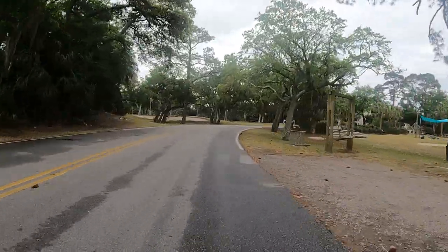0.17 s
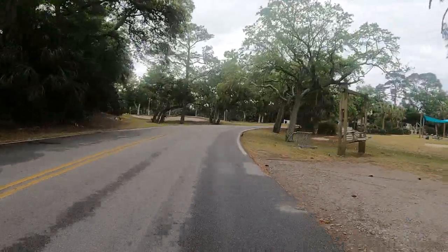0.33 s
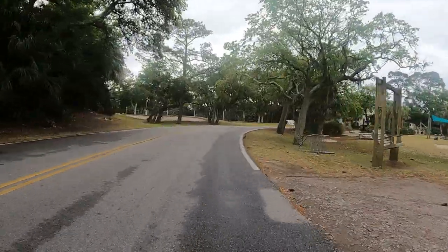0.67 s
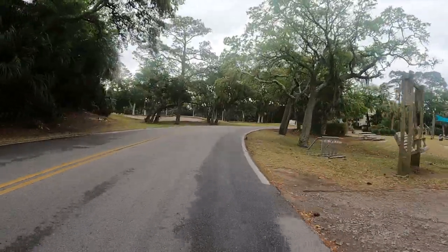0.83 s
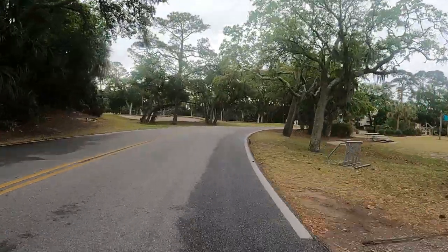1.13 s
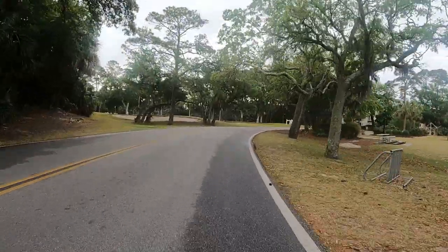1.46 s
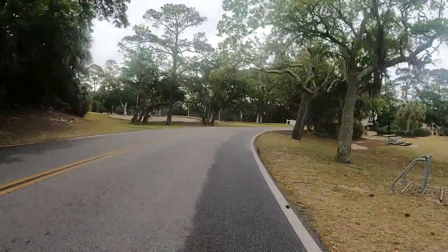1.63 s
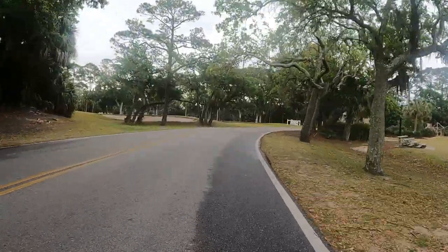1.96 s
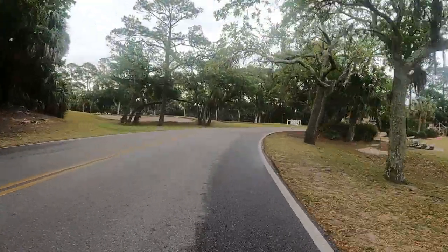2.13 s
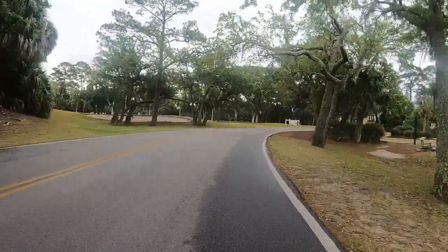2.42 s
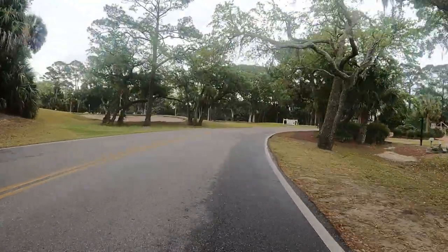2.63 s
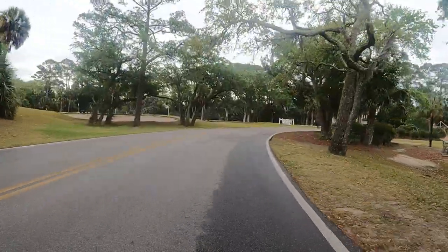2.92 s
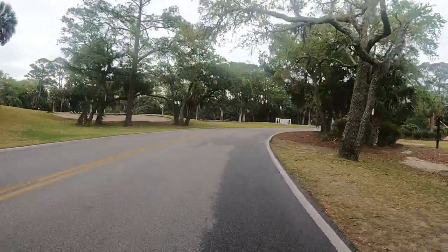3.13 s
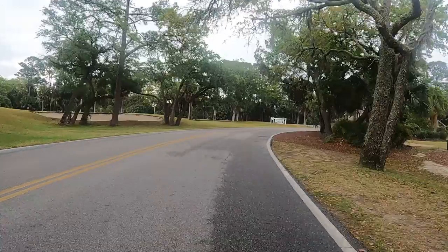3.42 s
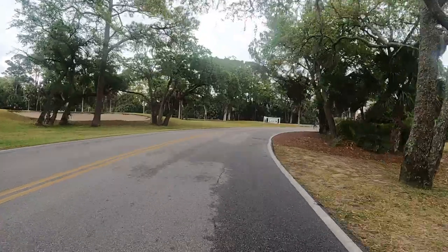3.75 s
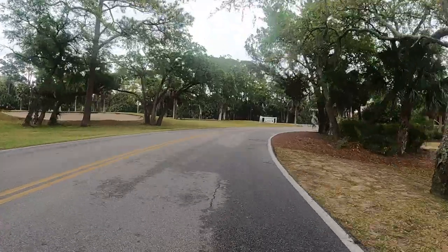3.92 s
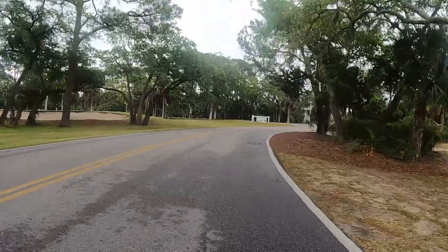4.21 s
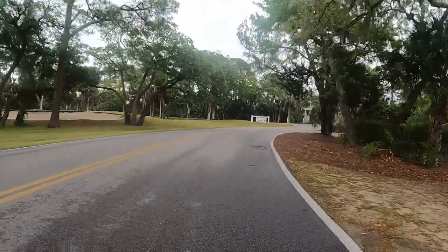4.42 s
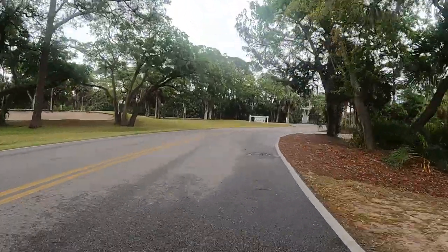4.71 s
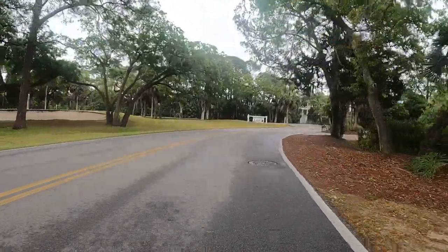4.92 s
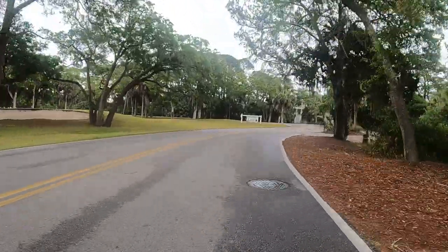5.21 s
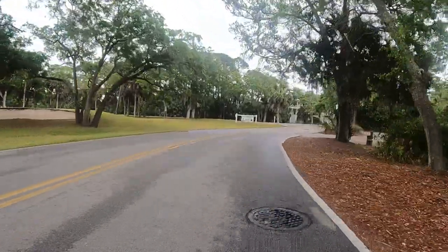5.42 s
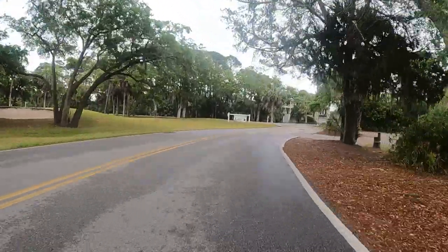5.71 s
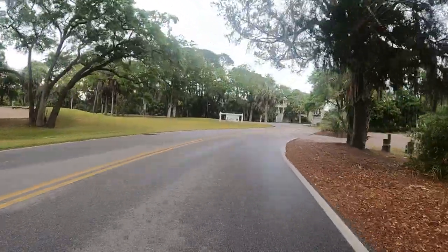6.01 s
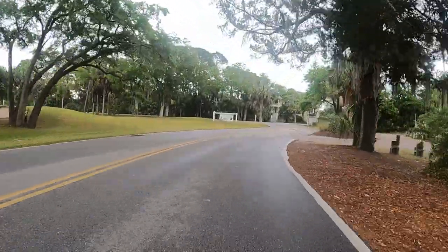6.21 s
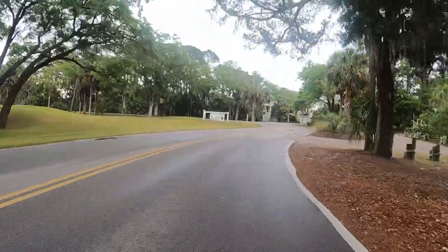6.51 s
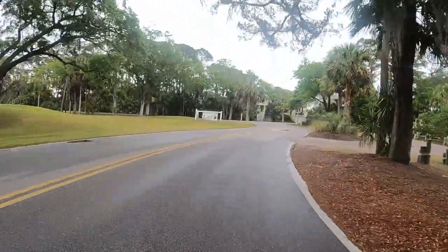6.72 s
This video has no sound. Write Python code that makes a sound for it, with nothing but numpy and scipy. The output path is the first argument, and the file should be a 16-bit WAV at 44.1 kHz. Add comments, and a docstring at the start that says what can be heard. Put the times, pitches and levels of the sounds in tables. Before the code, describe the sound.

A seven-second ride in a small petrol golf cart, heard in mono from the seat, outdoors on asphalt. The single-cylinder engine is already running at governed speed, firing about 24 times a second, a boomy, fluttering drone strongest around 100 to 200 Hz, with soft intake gulps and light valve ticks. Broad tyre roar, deep floor rumble, faint gear whine, fine high grit and a barely audible metallic jingle continue throughout. At 0.2 s a dull low bump; around 0.4 to 1.4 s wind gusts buffet the microphone, with slightly rougher road near 0.6 s, and a quick gust at 1.9 s. From 2 to 5.8 s it stays even, pitch wandering only slightly, the road roar lifting a touch at 2.9 s. Near 6 s a coarser patch brings another soft bump, more grit, then a short strong wind puff at 6.1 s. The engine sags about one percent lower by the end, still running.

```python
"""A petrol golf cart's single-cylinder four-stroke engine, heard from the seat on an asphalt road.
It fires about 24 times a second: tones locked to the engine cycle boom with muffler-like delays, and windowed
noise adds intake gulps and valve ticks. The transaxle whines faintly in sines and a loose part jingles.
Coloured noise makes tyre roar, body rumble, bumps and gusty wind; random impulses make the grit."""
import sys
import numpy as np
from scipy import signal
from scipy.fft import rfft, irfft, next_fast_len
from scipy.io import wavfile

SR = 44100
rng = np.random.default_rng(int(sys.argv[2]) if len(sys.argv) > 2 else 0)


def master_out(mix):
    """Clip the mix to full scale and print it as 16-bit PCM to the path in sys.argv[1]."""
    frames = np.transpose(np.atleast_2d(mix))
    ceiling = np.clip(frames, -1, 1)
    pcm = np.round(ceiling * 32767).astype(np.int16)
    wavfile.write(sys.argv[1], SR, pcm)


N = 302956

GOVERNED_RPM = 2916   # crankshaft speed; one firing cycle takes two turns


def from_db(db):
    """Turn decibels into amplitude gain."""
    return 10 ** (np.asarray(db) / 20)


def rms_one(x):
    """Scale to an rms of 1."""
    return x / np.sqrt(np.mean(x ** 2) + 1e-20)


def in_time(rows):
    """Interpolate each column of a curve to one value per sample; the first column is time."""
    s, *columns = np.transpose(rows)
    return [np.interp(np.arange(N) / SR, s, c) for c in columns]


def coloured(x, spectrum):
    """Filter x by a gain curve over log frequency, falling steeply beyond its ends; rms 1."""
    hz, db = np.transpose(spectrum)
    size = next_fast_len(N + SR // 4)
    f = np.maximum(np.fft.rfftfreq(size, 1 / SR), 1)
    gain = from_db(np.interp(np.log(f), np.log(hz), db))
    ends = np.minimum(1, np.minimum(f / hz[0], hz[-1] / f)) ** 2
    return rms_one(irfft(rfft(x, size) * gain * ends, size)[:N])


def drift(rate):
    """Smooth random wander with an rms of 1: noise low-passed near rate Hz by a double pole."""
    step = 40   # samples between computed points
    warm_up = 2000   # points dropped while the filter settles
    r = np.exp(-2 * np.pi * rate * step / SR)
    noise = rng.standard_normal(N // step + warm_up + 2)
    slow = signal.lfilter([1], [1, -2 * r, r * r], noise)[warm_up:]
    return np.interp(np.arange(N) / step, np.arange(len(slow)), rms_one(slow))


def stroke(cycle, centre, width):
    """A bell-shaped window that opens once per engine cycle; centre and width in cycles."""
    offset = (cycle - centre + .5) % 1 - .5
    return np.exp(-.5 * (offset / width) ** 2)


def swells(rows):
    """Add a bell-shaped rise and fall in dB for each row of time, lift and half-length."""
    t = np.arange(N) / SR
    return sum(db * np.exp(-.5 * ((t - s) / length) ** 2) for s, db, length in rows)


def exhaust(cycle, uneven_db, waver_db):
    """Each firing puffs through the muffler, whose resonances delay its harmonics into a short low ring."""
    # harmonics of the firing rate; 4, 7 and 8 boom, and the boom slowly passes from 7 to 8:
    # multiple of the firing rate, starting level/dB, level slope/(dB/s)
    orders = [(1, -36.5, 0.5), (2, -32, 0), (3, -33.5, 0), (4, -21, -0.24), (5, -26.5, -0.66),
              (6, -36, 0.5), (7, -23, -0.69), (8, -27, 0.7051), (9, -34, 0), (10, -36, 0), (11, -46.5, 0.5),
              (12, -48.5, 0.5), (13, -42.5, 0), (14, -43.5, -0.5), (15, -50, 0.5), (17, -47, 0)]
    # muffler resonances that delay each puff: f/Hz, width/Hz
    muffler = [(100, 10), (159, 104), (214, 49)]
    t = np.arange(N) / SR
    firing_hz = GOVERNED_RPM / 120
    out = np.zeros(N)
    for k, db, db_per_s in orders:
        lag = sum(2 * np.arctan(2 * (k * firing_hz - hz) / width) for hz, width in muffler)
        level_db = db + db_per_s * t + waver_db * drift(3.6)
        out += from_db(level_db) * np.cos(2 * np.pi * k * cycle - lag)
    firing_strength = from_db(uneven_db * drift(11))
    return np.sqrt(2) * out * firing_strength   # sqrt(2) makes the order levels rms


def intake(cycle, level_db):
    """The intake gulps air once a cycle: a short swell of mid-band noise."""
    # tone of the gulp: f/Hz, relative gain/dB
    intake_colour = [(220, -10.5), (285, 0), (320, -4), (385, -3), (470, -15), (800, -30)]
    gulps = rng.standard_normal(N) * stroke(cycle, 0.629, 0.076)
    return from_db(level_db) * coloured(gulps, intake_colour)


def valves(cycle, tick_db):
    """Two valves tick as they seat in each cycle, one more crisply than the other."""
    # tone of the ticks: f/Hz, relative gain/dB
    valve_colour = [(600, -10.5), (1200, 6.5), (1600, -3.5), (2400, -14), (3500, -22), (7000, -35)]
    seats = stroke(cycle, .81, 0.016) + 1.2 * stroke(cycle, .48, 0.033)
    return from_db(tick_db) * coloured(rng.standard_normal(N) * seats, valve_colour)


def transaxle(cycle, wobble):
    """Gear tones follow the engine speed, their phase blurred by backlash; wobble in radians."""
    # gear whine: f at governed speed/Hz, level/dB
    whine = [(680, -53.5), (729, -53.5), (1168, -53), (1290, -56.5), (1314, -63), (1360, -60.5),
             (2291, -62)]
    turned_s = cycle * 120 / GOVERNED_RPM   # time the same turning would take at governed speed
    out = np.zeros(N)
    for hz, db in whine:
        phase = 2 * np.pi * hz * turned_s + wobble * drift(4.5)
        out += from_db(db + 1.9 * drift(6.4)) * np.cos(phase)
    return np.sqrt(2) * out


def jingle(cycle, level_db, uneven_db):
    """The engine keeps a small loose metal part jingling thinly, with an uneven swell once a cycle."""
    # tone of the loose part: f/Hz, relative gain/dB
    jingle_colour = [(11600, -26.5), (12300, -2.5), (12800, -5), (13600, -22.5)]
    unevenness = from_db(uneven_db * np.clip(drift(15), -2, 2))
    shakes = (.8 + stroke(cycle, .6, .12)) * unevenness
    return from_db(level_db) * coloured(rng.standard_normal(N) * shakes, jingle_colour)


def tyres(rough_db, texture_db):
    """Tread on asphalt: a broad roar that flutters with the surface and sets the panels ringing."""
    # tone of the rolling noise: f/Hz, relative gain/dB
    road_colour = [(80, 2), (300, 5.5), (480, 0.5), (700, -3), (950, -4), (1080, -8.5), (1300, -6.5),
                   (1850, -13), (2650, -17), (3100, -23), (4500, -28.5), (6400, -33.5), (8700, -43),
                   (11500, -51)]
    # body panels that ring under the rolling noise: f/Hz, width/Hz, lift/dB
    panels = [(572, 34, 3.5), (668.5, 20, 5), (797, 61, 2.5), (1008, 17, 3), (1169, 120, 3), (1348, 38, 3),
              (1580, 87, 1.5), (2660, 70, 0.5), (2730, 57, 0)]
    smooth_db, slope_db_per_s = -31, -0.0571   # smooth asphalt, easing slowly as the ride goes on
    road_db = smooth_db + slope_db_per_s * np.arange(N) / SR + rough_db
    roar = coloured(rng.standard_normal(N), road_colour)
    for hz, width, lift_db in panels:
        b, a = signal.iirpeak(hz, hz / width, fs=SR)
        roar = roar + (from_db(lift_db) - 1) * signal.lfilter(b, a, roar)
    return from_db(road_db + texture_db * drift(14)) * rms_one(roar)


def grit(cycle, rough_db, grains_per_s, spread_db, shake):
    """Fine grains tick on the underbody as random impulses, louder each time the engine shakes it."""
    # tone of the grains: f/Hz, relative gain/dB
    grit_colour = [(2500, -1), (5000, 5), (8500, 4), (9700, -7), (10800, -4.5), (11500, -14.5),
                   (13000, -16.5), (15500, -15)]
    smooth_db = -66.5   # grit on smooth asphalt
    grit_per_roar = 1.8   # dB of grit per dB of roar
    born = rng.random(N) < grains_per_s / SR
    sizes = from_db(spread_db * np.minimum(rng.exponential(1, N), 5))
    impulses = born * sizes * rng.choice([-1, 1], N)
    shaken = impulses * (1 + shake * stroke(cycle, 0.66, .13))
    return from_db(smooth_db + grit_per_roar * rough_db) * coloured(shaken, grit_colour)


def rumble(level_db):
    """The rolling wheels shake floor and roof into a steady low noise."""
    # tone of the body: f/Hz, relative gain/dB
    rumble_colour = [(40, -2), (80, -3.5), (120, -1), (190, 0), (260, 1.5), (310, -7), (380, -12.5),
                     (480, -23.5)]
    return from_db(level_db) * coloured(rng.standard_normal(N), rumble_colour)


def bumps():
    """Uneven road heaves the body; soft tyres turn each bump into a dull swell of low noise."""
    # bumps in the road: t/s, level/dB, half-length/s
    road_bumps = [(0.193, -19, 0.042), (5.97, -19.5, 0.067)]
    # the body's answer to a bump: f/Hz, relative gain/dB
    bump_colour = [(25, -13), (40, 7.5), (62, -5), (90, -20), (150, -18), (300, -37)]
    t = np.arange(N) / SR
    heave = sum(from_db(db) * np.exp(-.5 * ((t - s) / length) ** 2) for s, db, length in road_bumps)
    return heave * coloured(rng.standard_normal(N), bump_colour)


def airstream(buffet_db):
    """Eddies press on the microphone as a deep, uneven rumble that rises with each gust."""
    # tone of the wind: f/Hz, relative gain/dB
    wind_colour = [(10, -8), (17, 0), (28, -6), (38, -12), (58, -10.5), (100, -21), (200, -33), (500, -58)]
    # gusts on top of the airstream: t/s, lift/dB, half-length/s
    gusts = [(.4, 4.5, .2), (.83, 5.5, .07), (1.35, 4, .17), (1.9, 8, 0.045), (6.12, 10, .05)]
    between_gusts_db = -30
    wind_db = between_gusts_db + swells(gusts) + buffet_db * drift(3.4)
    return from_db(wind_db) * coloured(rng.standard_normal(N), wind_colour)


def scene():
    """Mix engine, drive, road and air; engine sounds share one cycle count, road sounds one roughness."""
    # the governor hunts a little, then lets the speed sag: t/s, speed above governed/rpm
    speed = [(0, 12), (1.8, 1), (2.7, 10.1), (4.4, -3), (5.4, 2.6), (5.85, -18.3), (6.87, -27.3)]
    # coarser stretches of road swell the roar and throw up more grit: t/s, lift/dB, half-length/s
    rough_patches = [(.33, 1.1, .07), (.56, 2, 0.083), (.93, .9, 0.046), (2.9, 0.6, .09), (5.95, 1, 0.083)]
    extra_rpm, = in_time(speed)
    start_cycle = .632
    cycle = start_cycle + np.cumsum(GOVERNED_RPM + extra_rpm) / (120 * SR)
    rough_db = swells(rough_patches)
    engine = exhaust(cycle, uneven_db=0.32, waver_db=0.84)
    engine += intake(cycle, level_db=-37.0) + valves(cycle, tick_db=-51)
    drive = transaxle(cycle, wobble=1.0) + jingle(cycle, level_db=-81.5, uneven_db=1.4)
    road = tyres(rough_db, texture_db=0.16)
    road += grit(cycle, rough_db, grains_per_s=5100, spread_db=1.0, shake=0.45)
    road += rumble(level_db=-26) + bumps()
    return (engine + drive + road + airstream(buffet_db=1.1))[None]


def record(dry):
    """The microphone rounds the tallest peaks; a steep low-pass then cuts the top."""
    ceiling, cutoff_hz = 0.43, 15700
    rounded = dry / (1 + (dry / ceiling) ** 8) ** (1 / 8)
    low_pass = signal.ellip(10, .1, 80, cutoff_hz, fs=SR, output="sos")
    return signal.sosfilt(low_pass, rounded)


dry = scene()
out = record(dry)
master_out(out)
```